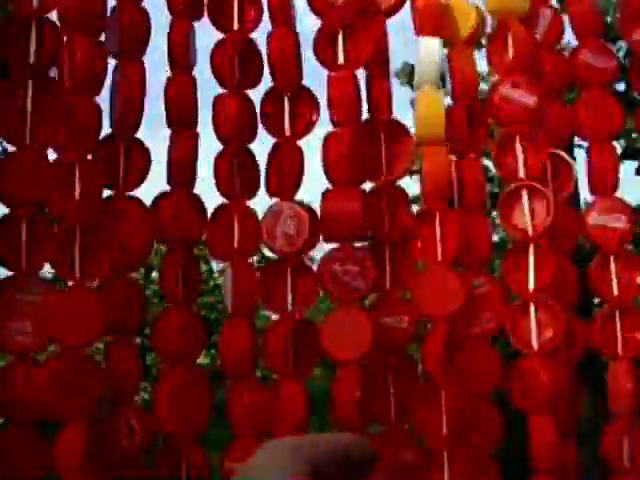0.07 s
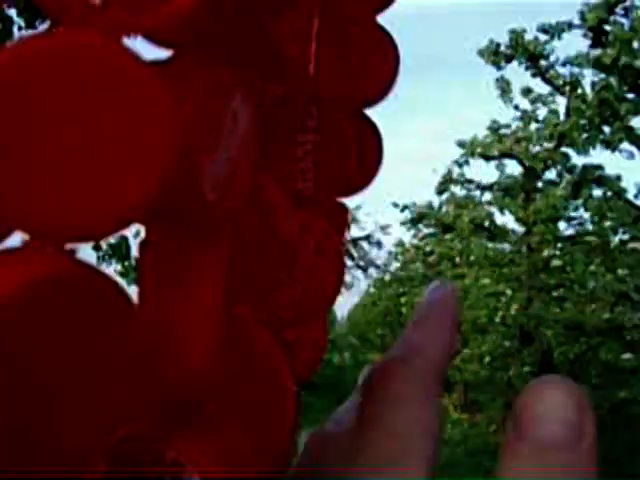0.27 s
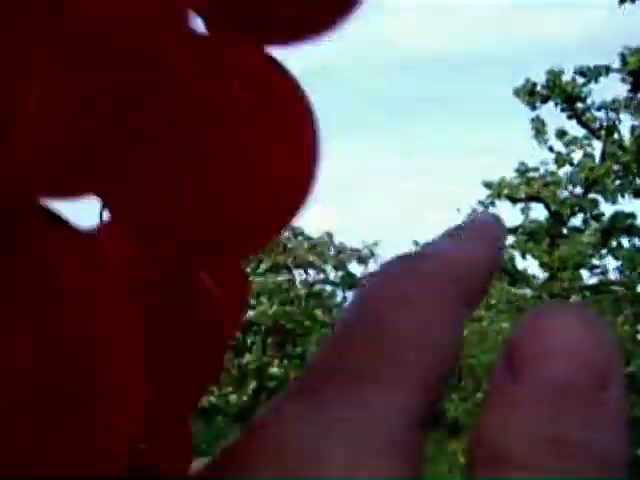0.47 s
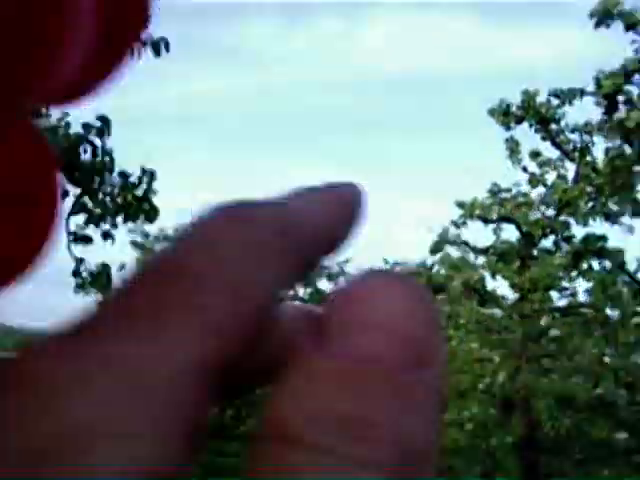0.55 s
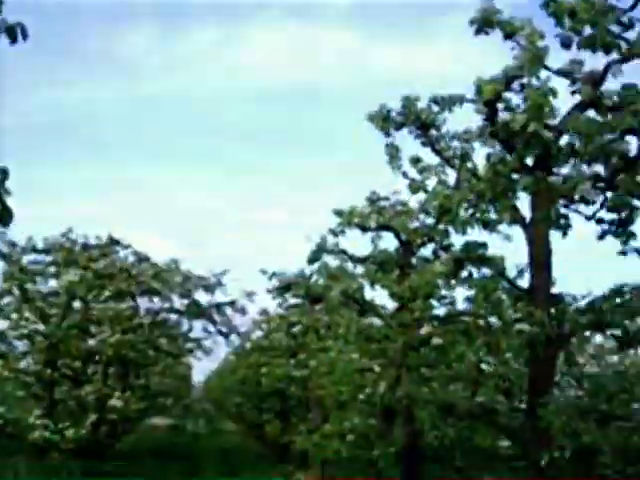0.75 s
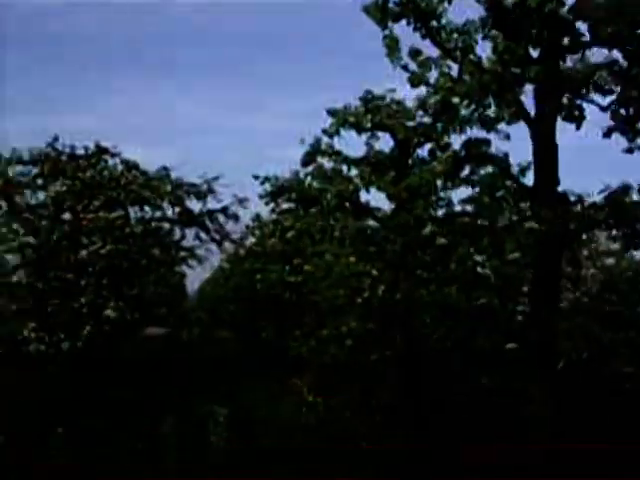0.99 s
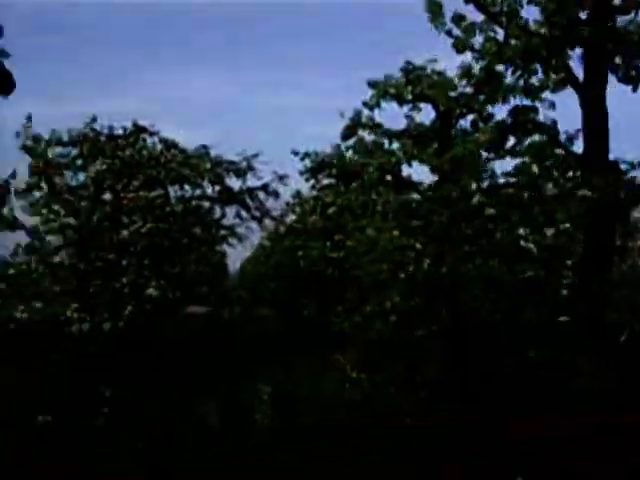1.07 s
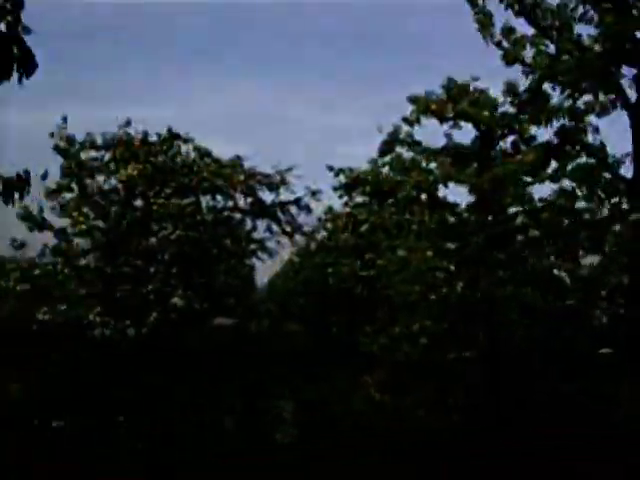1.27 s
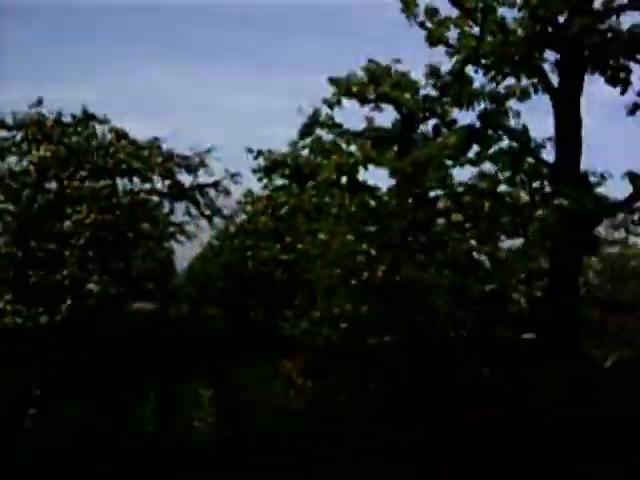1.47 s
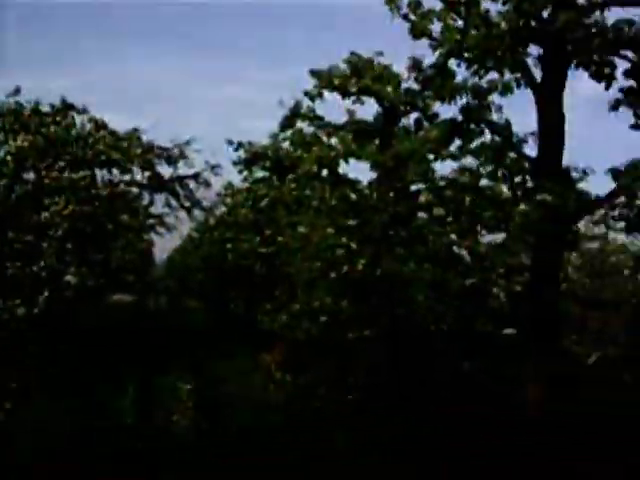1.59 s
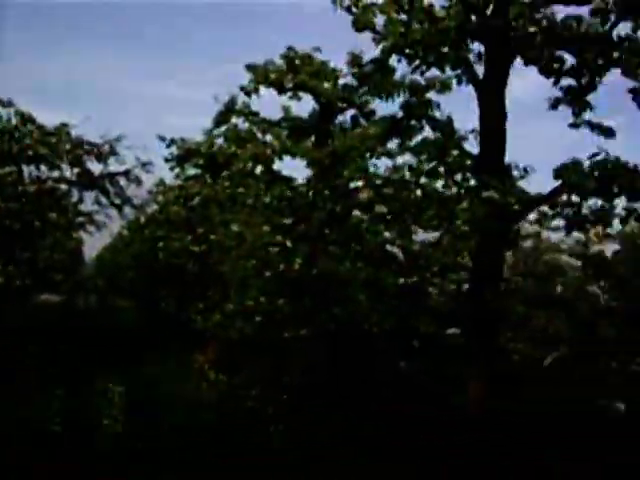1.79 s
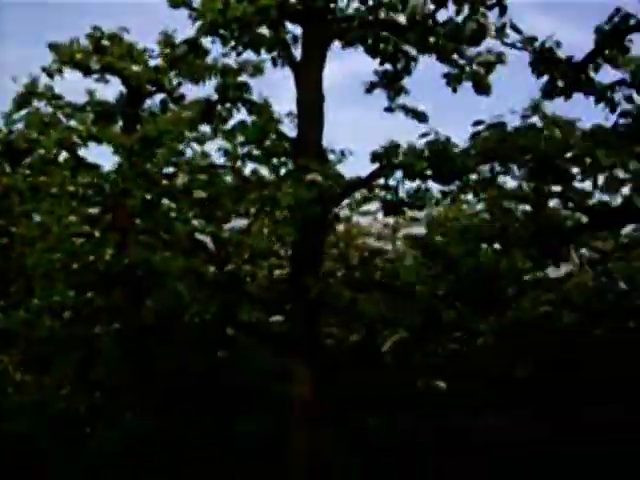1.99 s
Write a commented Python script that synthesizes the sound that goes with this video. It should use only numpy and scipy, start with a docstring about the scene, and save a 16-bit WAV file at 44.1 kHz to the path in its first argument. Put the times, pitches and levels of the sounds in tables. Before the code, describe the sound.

A hanging curtain of plastic bottle caps is swept aside outdoors, clicking and rattling close by before thinning to scattered ticks. The microphone is bumped and brushed early on, with faint wind rumble and a fluttery echo throughout.

```python
"""Outdoors, a curtain of strung plastic bottle caps is pushed aside. Near caps knock together and ring
with sharp clacks, while hundreds more touch and rub in a clatter that slowly settles.
Caps and puffs of air bump the microphone and a hand brushes it, over a light wind rumble and a faint hiss.
Everything passes through a short, repeating echo that makes it flutter."""
import sys
import numpy as np
from scipy import signal
from scipy.fft import rfft, irfft, next_fast_len
from scipy.io import wavfile
from scipy.ndimage import uniform_filter1d

SR = 44100
rng = np.random.default_rng(int(sys.argv[2]) if len(sys.argv) > 2 else 0)


def unload_wav(signal):
    """Save mono or channel-first audio to the path in sys.argv[1] as 16-bit WAV at rate SR, clipped to [-1, 1]."""
    wavfile.write(
        sys.argv[1],
        SR,
        np.round(np.clip(np.atleast_2d(signal).T, -1, 1) * 32767).astype(np.int16),
    )


N = 90404
TIME = np.arange(N) / SR
KNOCK_T60_S, SNAP_T60_S = 0.022, 0.018   # t60 is the time a sound takes to fade by 60 dB

# tone colour of the plastic's low knock, high knock and bright snap: f/Hz, relative level/dB
LOW_KNOCK_COLOUR = [(300, -17.5), (800, -14), (1400, -5), (2000, -1.5), (2500, -2.5), (3200, -0.5),
                    (3800, -1), (4600, -23)]
HIGH_KNOCK_COLOUR = [(3000, -21.5), (3900, -5.5), (4600, 5), (5300, -4), (6000, -4), (6600, -9),
                     (7600, -21)]
BRIGHT_SNAP_COLOUR = [(5400, -29), (6600, 1), (7600, 6), (8700, 4), (10000, 1), (12000, -3.5),
                      (13200, -5.5), (14500, -22.5)]


def from_db(db):
    """Turn decibels into a factor to multiply a sound by."""
    return 10 ** (np.asarray(db) / 20)


def level_curves(rows):
    """Join rows of (t/s, level/dB, ...) into one gain curve for each level column."""
    times, *columns = np.transpose(rows)
    return [from_db(np.interp(TIME, times, db)) for db in columns]


def coloured(x, colour):
    """Filter a sound so that its tone follows (f/Hz, level/dB) points."""
    size = 2 * next_fast_len(len(x))
    hz, db = np.transpose(colour)
    grid = np.maximum(np.arange(size // 2 + 1) * SR / size, 1)
    roll_off = np.minimum(grid / hz[0], 1) * np.minimum(hz[-1] / grid, 1) ** 2
    response = roll_off * from_db(np.interp(np.log(grid), np.log(hz), db))
    # minimum phase: nothing comes out of the filter before the sound goes in
    cepstrum = irfft(np.log(response))
    cepstrum[1:size // 2] *= 2
    cepstrum[size // 2 + 1:] = 0
    return irfft(rfft(x, size) * np.exp(rfft(cepstrum)))[:len(x)]


def noise(colour):
    """Steady noise of a given tone colour, with an average (rms) level of 1."""
    x = coloured(rng.standard_normal(N), colour)
    return x / np.sqrt(np.mean(x ** 2) + 1e-20)


def decay(t60, rise_s=0.000096):
    """The loudness of one hit: a quick rise, then a smooth fall."""
    t = TIME[:2048]
    return (1 - np.exp(-t / rise_s)) * np.exp(-np.log(1000) * t / t60)


def ring(hz, t60):
    """One clear tone of a cap: it builds up as the shell takes the blow, then dies away."""
    shape = decay(t60, rise_s=0.00042)
    return shape * np.sin(2 * np.pi * hz * TIME[:len(shape)])


def knock(colour, t60):
    """Many close tones struck at once, which blur into a burst of noise."""
    shape = decay(t60)
    return coloured(shape * rng.standard_normal(len(shape)), colour)


def at_level(x, db, window_s=.005):
    """Give a short sound the energy of that level held for window_s."""
    return x * from_db(db) * np.sqrt(window_s * SR / np.sum(x ** 2))


def add(out, start_s, x):
    """Mix a sound in at a given time."""
    i = max(int(start_s * SR), 0)
    out[i:i + len(x)] += x[:N - i]


def evened(x):
    """Hold the running average level at 1, leaving single clicks standing out."""
    return x / np.sqrt(np.abs(uniform_filter1d(x ** 2, size=1500)) + 1e-12)


def wind(air_db=-63.5):
    """Gusts rumble against the microphone over the steady rush of the open air."""
    # strength of the gusts: t/s, level/dB
    gust_levels = [(0, -51.5), (.1, -54.5), (.21, -47.5), (.29, -60), (.45, -57.5), (.6, -54), (.7, -70),
                   (1.1, -76.5), (1.56, -78), (1.62, -64), (1.73, -55), (1.81, -56.5), (1.9, -70),
                   (2.03, -63.5)]
    # tone colour of the rumble and of the air: f/Hz, relative level/dB
    rumble_colour = [(20, -17), (45, 2.5), (90, 6.5), (150, -5), (250, -17), (450, -26), (1000, -57),
                     (3000, -56)]
    air_colour = [(30, 4), (150, 2.5), (400, 6), (800, 1.5), (1300, 6.5), (3000, -13), (5000, -16),
                  (8000, -12.5), (12000, -21), (13500, -32)]
    gusts, = level_curves(gust_levels)
    return gusts * noise(rumble_colour) + from_db(air_db) * noise(air_colour)


def hiss(level_db=-74.5):
    """A faint, high hiss, separate for left and right."""
    # tone colour of the hiss: f/Hz, relative level/dB
    hiss_colour = [(1500, -3), (4000, 5), (8000, -1), (12000, 7), (13000, -22)]
    return from_db(level_db) * np.array([noise(hiss_colour), noise(hiss_colour)])


def clatter(pitch_count=24, touches_per_s=520, spread_db=4, ring_t60_s=0.025):
    """Hundreds of caps touch at random, ringing and knocking, and rub as they slide past each other."""
    # rise and fall of the clatter: t/s, low level/dB, high level/dB, snap level/dB
    clatter_levels = [(0, -61, -66, -65.5), (0.19, -68, -66.5, -63.5), (0.25, -43.5, -45.5, -47),
                      (0.33, -51.5, -47, -51.5), (0.39, -34.5, -40, -46), (0.45, -44, -44, -53),
                      (0.51, -42.5, -55, -54), (0.55, -41.5, -37.5, -46.5), (0.66, -40.5, -48.5, -52),
                      (0.76, -43, -53, -58), (0.81, -45.5, -53.5, -60), (0.89, -39, -51, -57.5),
                      (0.97, -45, -51, -56.5), (1.06, -48, -54.5, -62.5), (1.15, -42, -45.5, -57.5),
                      (1.24, -42, -49, -57), (1.36, -42.5, -46.5, -52.5), (1.45, -54.5, -58.5, -59.5),
                      (1.59, -50.5, -49, -58), (1.68, -59, -63, -83), (1.76, -57, -65, -77),
                      (1.82, -54, -54.5, -74), (1.9, -56.5, -60.5, -57.5), (1.98, -58.5, -58, -74),
                      (2.03, -49, -53.5, -64.5)]
    low, high, snap = level_curves(clatter_levels)
    touches = rng.random(N) < touches_per_s / SR
    touches = touches * from_db(spread_db * np.minimum(rng.exponential(1, N), 4))
    struck_cap = rng.integers(0, pitch_count, N)
    out = np.zeros(N)
    # ring_db, knock_db and rub_db are added to the table's levels
    for gain, range_hz, ring_db in ((low, (2263, 3082), -8.5), (high, (4022, 5530), -6)):
        pitches = rng.permutation(np.geomspace(*range_hz, pitch_count))
        rings = sum(signal.oaconvolve(touches * (struck_cap == cap), ring(hz, ring_t60_s))[:N]
                    for cap, hz in enumerate(pitches))
        out += gain * from_db(ring_db) * evened(rings)
    touch_energy = signal.oaconvolve(touches ** 2, decay(SNAP_T60_S) ** 2)[:N]
    touch_shape = np.sqrt(np.abs(touch_energy))
    for gain, colour, knock_db, rub_db in ((low, LOW_KNOCK_COLOUR, -7, -9),
                                           (high, HIGH_KNOCK_COLOUR, -10.5, -11.5),
                                           (snap, BRIGHT_SNAP_COLOUR, -5.5, -12.5)):
        knocks = evened(coloured(touch_shape * rng.standard_normal(N), colour))
        out += gain * (from_db(knock_db) * knocks + from_db(rub_db) * noise(colour))
    return out


def bumps(fade_cycles=2.4):
    """Caps and puffs of air bump the microphone: each is a dull swing of pressure that soon dies."""
    # bumps on the microphone: t/s, peak level/dB, f/Hz
    thumps = [(.020, -52, 640), (0.037, -40.5, 90), (0.086, -33.5, 190), (.121, -41, 256), (.238, -34, 105),
              (0.311, -41.5, 92), (0.343, -43, 104), (0.514, -36.5, 152), (.539, -35.5, 546),
              (0.563, -27.5, 223), (.577, -32, 630), (.589, -25, 675), (1.746, -35.5, 130),
              (1.762, -39, 95.5)]
    out = np.zeros(N)
    for start_s, db, hz in thumps:
        cycles = hz * TIME[:N // 10]
        shape = cycles ** 2 * np.exp(-2 * np.log(1000) * cycles / fade_cycles)
        swing = shape * np.sin(2 * np.pi * cycles)
        add(out, start_s, from_db(db) * swing / np.abs(swing).max())
    return out


def clacks(hard_from_db=-34.5, overtone_ratio=1.7):
    """Near caps hit each other: each rings with its own tones over a dull knock and a bright snap."""
    # hits and their three tones, with the base levels that each part below is set from:
    # t/s, low f/Hz, low level/dB, high f/Hz, high level/dB, top f/Hz, top level/dB, ring t60/s
    hits = [(.096,2800,-61,4630,-58,7400,-72,0.0072), (0.2312,2750,-56,4750,-37.5,7700,-50,0.0099),
            (0.2351,2170,-71,4730,-37,7400,-55,0.0078), (0.257,2060,-32.5,5530,-38,7500,-38,0.0062),
            (0.2642,2390,-50,4920,-32,7300,-50,.008), (0.2723,2480,-22.5,5440,-19,7670,-35,0.018),
            (0.2968,2600,-38.5,5300,-43,7800,-59,0.0062), (0.2998,2370,-36,5540,-45,7600,-54,.008),
            (.3455,3750,-34.5,4960,-18,8800,-35.5,0.0043), (0.3488,3720,-48,4560,-24.5,7100,-42.5,0.0047),
            (0.3515,3850,-38,4420,-39,7500,-57,.007), (0.3683,2200,-39,5670,-39,7900,-58,0.0073),
            (0.3753,2570,-46,5070,-44,7450,-60,0.006), (0.3815,3760,-35,4270,-33,7700,-46,.006),
            (0.3888,2400,-35.5,4970,-40,7900,-47,0.0022), (0.391,2550,-29,4200,-42,8500,-45,0.005),
            (.4027,3000,-59,5240,-57,7500,-67,0.014), (0.4947,2680,-39.5,5000,-42,7400,-51,0.0059),
            (.512,2920,-57,3930,-50,7460,-64,.007), (0.532,2550,-44,4330,-40,8600,-47.5,.006),
            (0.5336,2510,-34,4130,-34,7850,-41,0.024), (0.5408,4000,-37.5,6470,-32,7960,-44,0.0096),
            (.568,2680,-38,4840,-34,7300,-55,0.0097), (.5792,3000,-35,4980,-32,7130,-47,.01),
            (0.5893,2570,-37.5,3880,-40.5,7540,-55,0.014), (0.6208,2700,-36,4280,-41,8600,-47,0.0061),
            (.6295,2450,-35,4170,-52,7400,-54,0.0066), (0.64,2440,-34,4240,-57,8940,-66,0.015),
            (0.6493,2640,-35.5,6360,-44,7300,-56,0.0096), (.657,2480,-40,4700,-38,7000,-49,.008),
            (0.6914,2460,-39,5140,-43,7660,-49,0.014), (.7227,2870,-37,4290,-44.5,7750,-64,0.0092),
            (.7687,2280,-45,4300,-58,8570,-71,.008), (0.7849,3450,-33.5,4030,-38,7700,-50,0.0069),
            (0.7945,2320,-40,4050,-58,7340,-52,0.012), (0.8098,2450,-53,4130,-55,7060,-61,0.0063),
            (0.8404,2780,-39,4350,-53,7130,-65,.008), (0.854,2890,-40,4410,-56,8300,-66,0.0087),
            (0.8599,2530,-43,5030,-39.5,8000,-63,0.013), (.874,2230,-44,3950,-46,7840,-47,0.0045),
            (.8806,2530,-36,4440,-46,7000,-59,0.0079), (0.8993,2890,-38,4180,-58,7280,-54,0.011),
            (.916,2950,-40,4300,-45,9190,-65,.009), (0.9268,2480,-41,4220,-62,8030,-72,0.0083),
            (.9346,2700,-48,5530,-42.5,7920,-66,0.013), (.957,2550,-38,3900,-39.5,9100,-58,0.0048),
            (0.9706,2430,-46,4160,-57,7300,-71,0.0067), (0.9958,2300,-31,5100,-45,6900,-55,0.0087),
            (1.0265,2410,-51,4000,-44.5,11390,-56.5,.007), (1.0535,3490,-43.5,4080,-44.5,7750,-65,0.0077),
            (1.0794,2710,-49,4270,-45.5,7240,-74,0.011), (1.0956,2710,-47,4000,-45,7060,-65,0.012),
            (1.127,2980,-45,5430,-58,7280,-71,0.01), (1.159,3080,-54,5190,-47,7130,-67,.008),
            (1.1791,2360,-42,4050,-43.5,8660,-69,0.0059), (1.1843,2670,-45,4700,-48,8870,-67,.008),
            (1.205,2380,-42,4400,-43,6800,-60,0.013), (1.2113,2454,-22.5,4150,-30.5,9430,-45.5,0.018),
            (1.2258,2440,-39.5,4360,-52,8140,-64,0.013), (1.243,2150,-45,4300,-45,7130,-63,0.01),
            (1.25,3280,-33,5440,-37,7400,-55,0.0072), (1.263,2540,-33.5,4100,-42,10570,-53,0.0079),
            (1.288,2590,-31.5,4060,-47,7450,-58,0.013), (1.3038,2180,-35.5,4000,-50,9350,-63,0.01),
            (1.344,2560,-42,3940,-41.5,7040,-64,0.0034), (1.3538,2700,-41,4400,-37.5,7120,-43,0.0094),
            (1.3672,3550,-41.5,4800,-44,7490,-59,0.006), (1.38,2900,-39,4300,-40,8250,-62,0.0055),
            (1.3997,2710,-42,4950,-52,7170,-65,0.0073), (1.439,2450,-48,5350,-45,8700,-67,0.0073),
            (1.4427,2550,-41.5,6700,-49,7300,-67,0.0052), (1.5045,2950,-31,4800,-39.5,7130,-69,0.025),
            (1.5298,2150,-49,5000,-62,7210,-59,.008), (1.5421,3500,-46.5,3920,-53,6910,-71,.008),
            (1.576,2700,-43,4560,-40,7400,-49,0.0044), (1.5759,2800,-55,5780,-38.5,9200,-52,0.016),
            (1.5835,3250,-46,4240,-46,9410,-67,0.0064), (1.639,2730,-61,5060,-51,6800,-70,.012),
            (1.6467,3640,-58,4700,-56,8720,-74,0.0092), (1.7074,2480,-46.5,5260,-48,8270,-65,0.023),
            (1.737,3640,-51.5,4940,-47,7300,-68,0.012), (1.786,2330,-51,4450,-45.5,7370,-55,.008),
            (1.802,2580,-63,4130,-52,7040,-70,.014), (1.8146,2820,-49.5,4840,-62,8030,-70,0.018),
            (1.831,2790,-52,4130,-62,8270,-73,0.018), (1.844,3350,-66,4510,-50,7200,-77,0.024),
            (1.9196,3470,-57,4500,-56,7710,-77,.014), (1.934,1810,-54.5,4600,-53.5,8600,-72,0.0088),
            (1.9622,3700,-51.5,3970,-58,7020,-71,0.019), (2.0195,3480,-46,4670,-63,7020,-71,0.013)]
    out = np.zeros(N)
    for start_s, low_hz, low_db, high_hz, high_db, top_hz, top_db, t60 in hits:
        knock_cut_db = 0.44 * max(low_db - hard_from_db, 0)   # hard blows ring more and thud less
        rings = (at_level(ring(low_hz, t60), low_db)
                 + at_level(ring(high_hz, t60), high_db - 1.6)
                 + at_level(ring(top_hz, t60 / 2), top_db - 2)
                 + at_level(ring(top_hz * overtone_ratio, t60 / 2), top_db - 8))
        knocks = (at_level(knock(LOW_KNOCK_COLOUR, KNOCK_T60_S), low_db - 9.5 - knock_cut_db)
                  + at_level(knock(HIGH_KNOCK_COLOUR, KNOCK_T60_S), high_db - 4 - knock_cut_db))
        snap = at_level(knock(BRIGHT_SNAP_COLOUR, SNAP_T60_S), top_db - 3)
        add(out, start_s, rings + knocks + snap)
    return out


def hand_brush():
    """A hand passes the microphone with a soft, dull rub that swells and fades."""
    # strength of the rub: t/s, level/dB
    rub_levels = [(.5, -64.5), (.575, -51.5), (.62, -57), (.68, -57), (.85, -63.5), (1.0, -93)]
    # tone colour of the rub: f/Hz, relative level/dB
    rub_colour = [(150, -9.5), (350, -0.5), (700, 2.5), (1100, -5), (1800, -4)]
    gain, = level_curves(rub_levels)
    return gain * noise(rub_colour)


def scene():
    """Mix everything in stereo; the caps reach the right side one sample before the left."""
    caps_right = clacks() + clatter()
    caps_left = np.pad(caps_right, (1, 0))[:N]
    return np.array([caps_left, caps_right]) + hiss() + bumps() + hand_brush() + wind()


def record(dry):
    """An echo feeds back into itself, repeating everything ever fainter; the highest treble is cut."""
    echo_s, feedback, cutoff_hz = .04, .5, 14800
    out, lag = dry.copy(), round(echo_s * SR)
    for i in range(lag, N, lag):
        out[:, i:i + lag] += feedback * out[:, i - lag:i][:, :N - i]
    low_pass = signal.cheby2(12, 70, cutoff_hz, fs=SR, output="sos")
    return signal.sosfilt(low_pass, out)


dry = scene()
out = record(dry)
unload_wav(out)
```